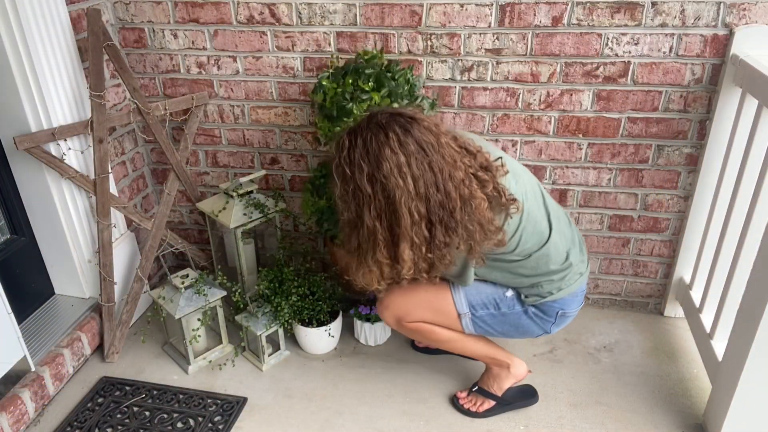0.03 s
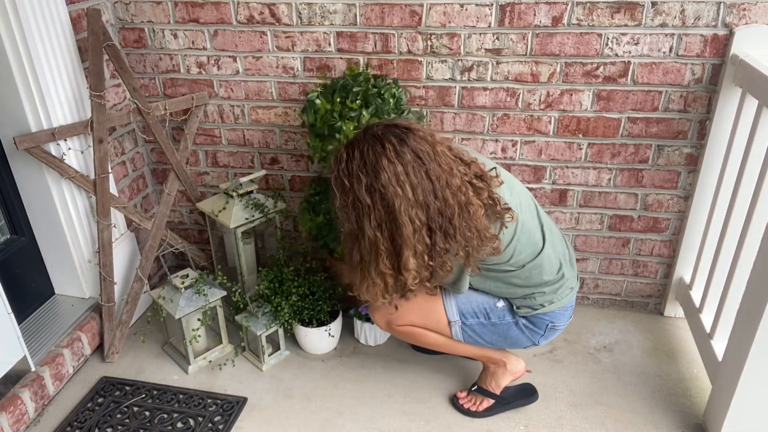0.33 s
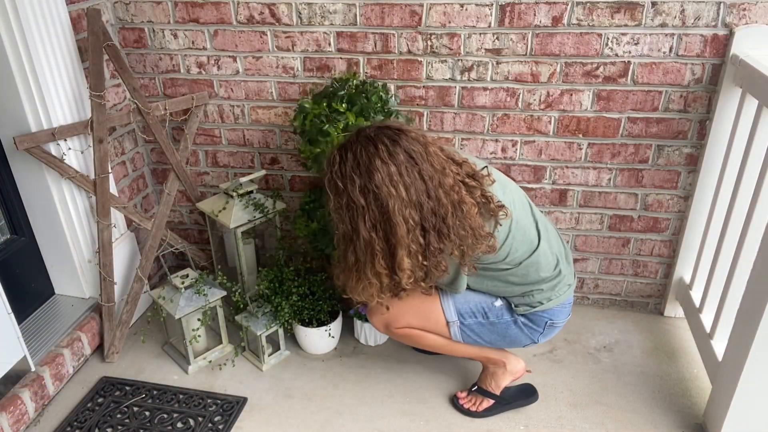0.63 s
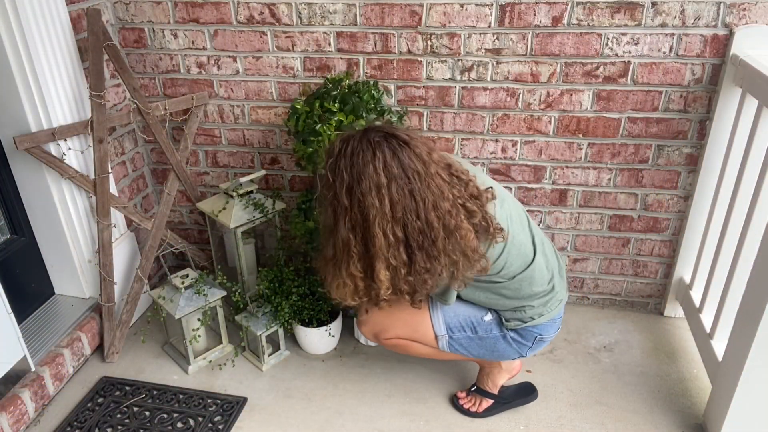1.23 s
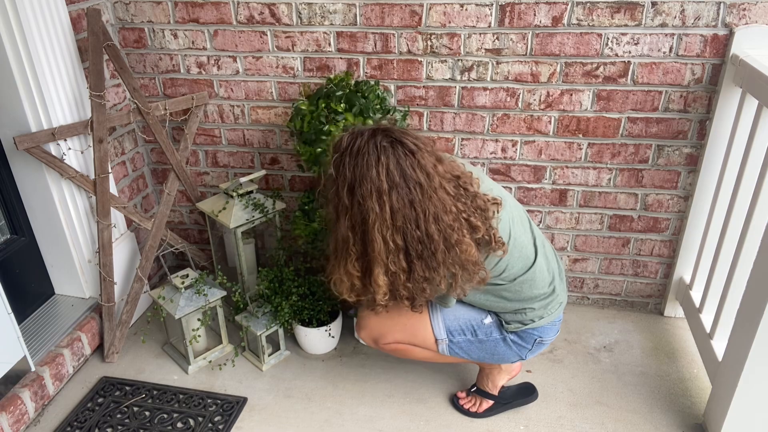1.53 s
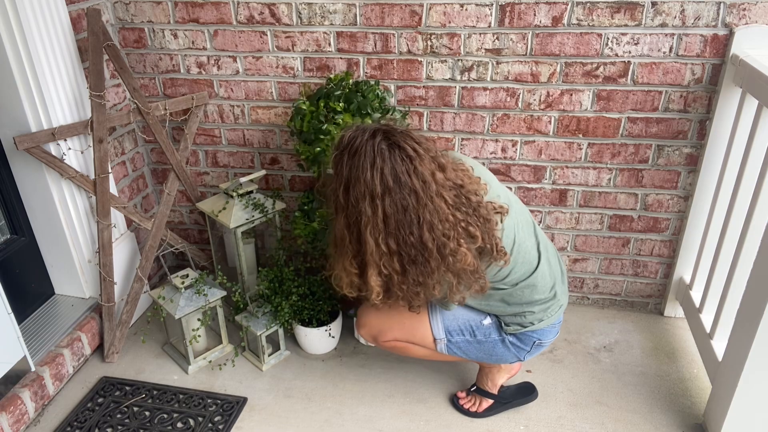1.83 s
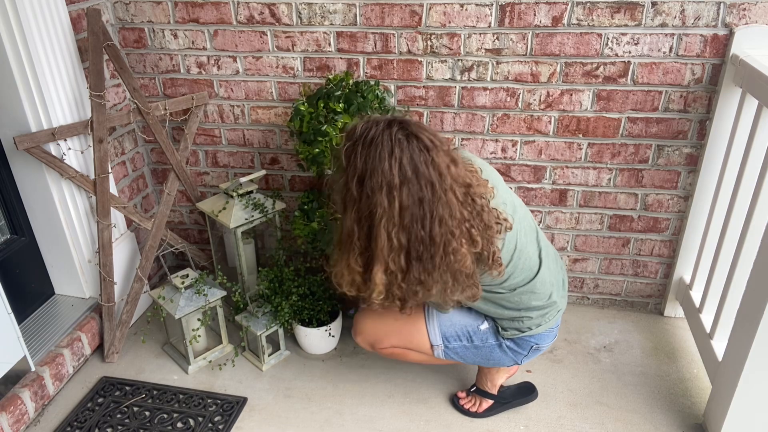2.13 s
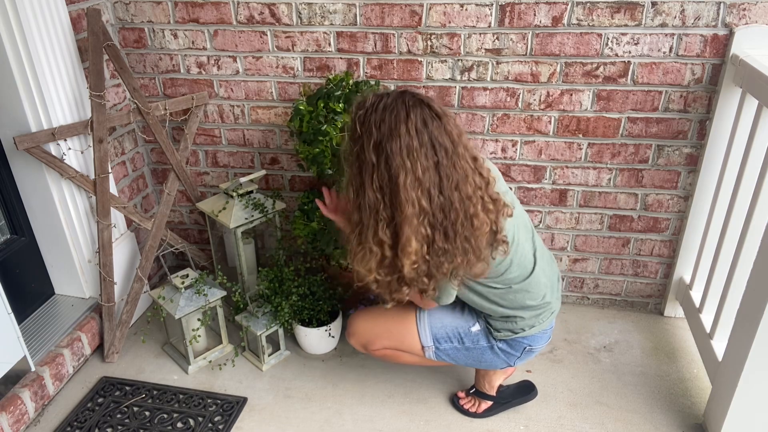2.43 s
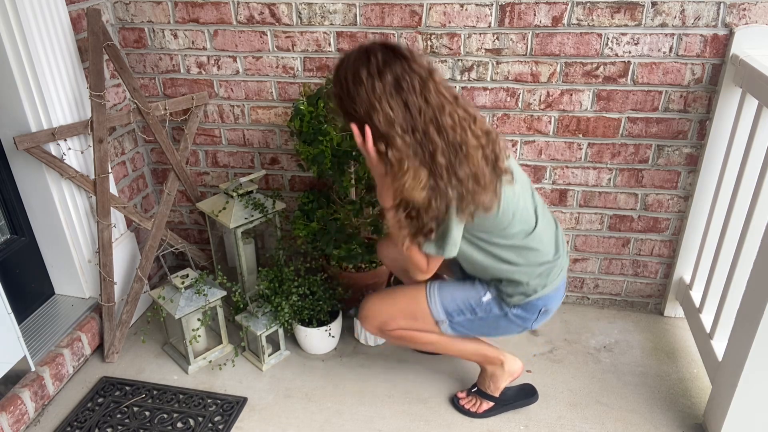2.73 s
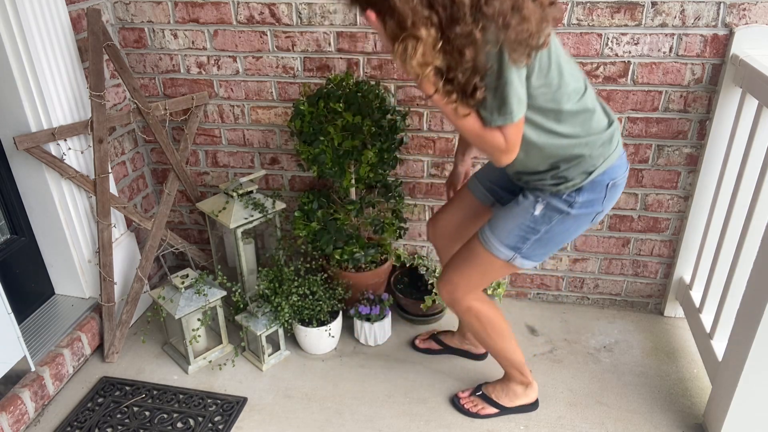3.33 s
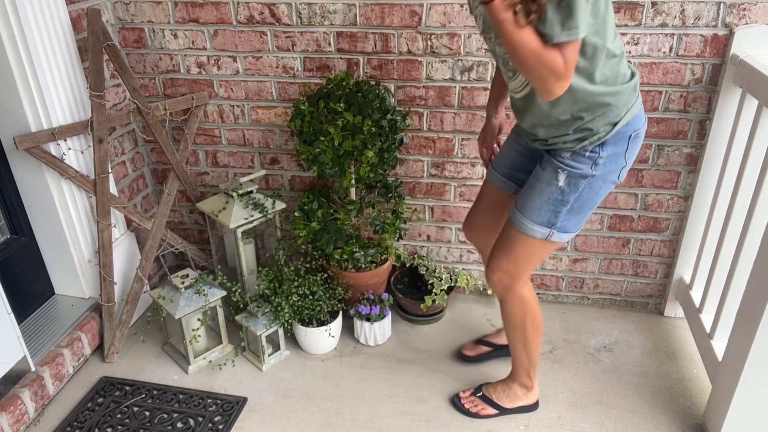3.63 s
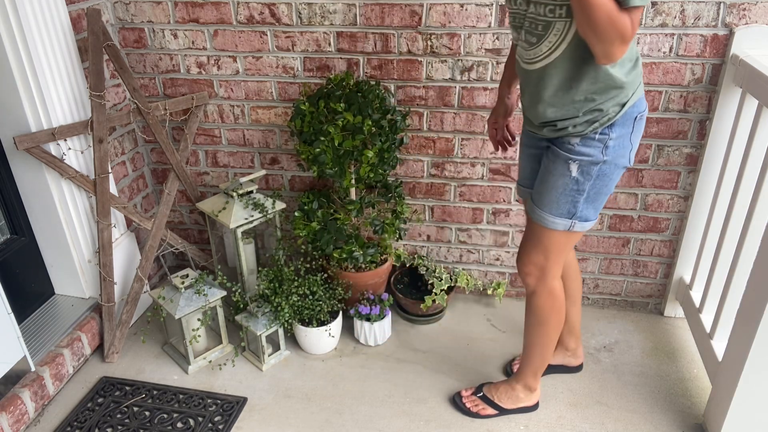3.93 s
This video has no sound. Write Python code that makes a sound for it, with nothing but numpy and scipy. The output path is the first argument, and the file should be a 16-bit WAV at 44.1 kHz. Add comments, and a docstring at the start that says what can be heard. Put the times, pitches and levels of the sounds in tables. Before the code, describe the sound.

Close by on a porch, a plant pot is nudged across concrete in short scrapes, set down with a knock and slid again. Faint bird chirps and rustling leaves follow over a low hum, ending with one sandal slap.

```python
"""On a concrete porch, a plant pot is nudged along in short gritty scuffs, set down with a knock and a
clink against its neighbour, then dragged once more. Grit crushed under its foot makes the pot ring.
Leaves rustle, and a sandal squeaks and slaps as the gardener steps back. Small birds whistle over a
low outdoor hum. The brick wall and the floor add a short, bright echo."""
import sys
import numpy as np
from scipy import signal
from scipy.fft import rfft, irfft
from scipy.io import wavfile
from scipy.ndimage import uniform_filter1d

SR = 44100
rng = np.random.default_rng(int(sys.argv[2]) if len(sys.argv) > 2 else 0)


def inscribe(sig):
    """Save sig as 16-bit PCM at rate SR to the path in sys.argv[1].

    A 1-D sig is mono; a 2-D sig holds one channel per row.
    Samples are clipped to [-1, 1] before scaling.
    """
    pcm = np.round(np.clip(np.atleast_2d(sig).T, -1, 1) * 32767)
    wavfile.write(sys.argv[1], SR, pcm.astype(np.int16))


N = 176400
T = np.arange(N) / SR
LEFT_RIGHT = np.array([[1], [-1]])  # plus for the left ear, minus for the right

# The tones the pot rings with. Each row: pitch in Hz, relative level in dB, seconds to fade by 60 dB.
POT_TONES = [(1089, -2, 0.23), (1126, -7.5, 0.14), (1183, -0.5, 0.069), (1260, 3, 0.19), (1437, -0.5, 0.16),
             (1855, 4.5, 0.085), (1987, 2.5, 0.12), (2170, 2, 0.13), (2250, 5.5, 0.21), (3062, -3, 0.28),
             (3484, -3, 0.25), (3960, 2.5, 0.12), (4900, 9.5, 0.037), (6061, -13, 0.16),
             (7470, 17.5, 0.043), (12100, 5, 0.12)]


def undb(db):
    """Turn decibels into a number to multiply by."""
    return 10 ** (np.asarray(db) / 20)


def unit(x):
    """Scale a signal to an average power of 1."""
    return x / np.sqrt(np.mean(x ** 2))


def curve(rows):
    """A strength that moves over time through (seconds, dB) points."""
    return undb(np.interp(T, *np.array(rows).T))


def response(points, size):
    """The strength of each frequency, on a line through (Hz, dB) points."""
    hz, db = np.array(points).T
    log_hz = np.log(np.fft.rfftfreq(size, 1 / SR) + 1e-3)
    return undb(np.interp(log_hz, np.log(hz), db))


def colour(x, points):
    """Shape a sound's bass and treble. Each row of a colour table: frequency in Hz, relative dB."""
    cepstrum = irfft(np.log(unit(response(points, N))))
    # Fold the filter so that nothing sounds before its cause.
    cepstrum[1:N // 2] *= 2
    cepstrum[N // 2 + 1:] = 0
    impulse = irfft(np.exp(rfft(cepstrum)))[:N // 20]
    return signal.fftconvolve(x, impulse)[:N]


def walk(per_s):
    """A smooth random wander, about 1 in size."""
    span = max(int(SR / per_s), 2)
    steps = rng.standard_normal(N)[np.arange(N) // span]
    return unit(uniform_filter1d(uniform_filter1d(steps, span), span))


def grit(per_s, scatter_db):
    """Tiny impacts of unequal size at random moments."""
    size = undb(scatter_db * np.minimum(rng.exponential(size=N), 3))
    strikes = rng.random(N) < per_s / SR
    return unit(strikes * size * rng.choice([-1, 1], N))


def burst(start, attack, hold, release):
    """A straight rise that dies away once the hold is over; all times in seconds."""
    return np.clip((T - start) / attack, 0, 1) * np.exp(-np.maximum(T - start - hold, 0) / release)


def swell(start, length):
    """A smooth rise and fall."""
    return np.sin(np.pi * np.clip((T - start) / length, 0, 1))


def fade(t, seconds):
    """A fall of 60 dB in the given time."""
    return np.exp(-np.log(1000) * t / seconds)


def tap(start):
    """One clean, hard contact."""
    return 1. * (np.arange(N) == int(start * SR))


def blows(rows, crunch_s):
    """Each (seconds, dB) blow crushes grit for a few milliseconds."""
    force = sum(undb(db) * burst(start, 0.000088, 0, crunch_s) for start, db in rows)
    return force * rng.choice([-1, 1], N)


def ring(x, tones):
    """A struck object rings with fading tones, each a little out of step between the ears."""
    t = T[:N // 8]
    body = 0
    for hz, db, fade_s in tones:
        phase = rng.uniform(0, 2 * np.pi) + 0.48 * rng.choice([-1, 1]) * LEFT_RIGHT
        body = body + undb(db) * fade(t, fade_s) * np.sin(2 * np.pi * hz * t + phase)
    return signal.fftconvolve(x[None], body / np.linalg.norm(body[0]), axes=1)[:, :N]


def porch(x, echo_db):
    """The sound itself, quick echoes off wall and floor, and a weaker, duller tail for each ear."""
    dull_above_hz, build_up_s = 5470, 0.0026
    t = T[:N // 8]
    early, late = rng.standard_normal((2, 2, len(t)))
    smoothing = np.exp(-2 * np.pi * dull_above_hz / SR)
    late = undb(-7) * signal.lfilter([1 - smoothing], [1, -smoothing], late)
    walls = early * fade(t, seconds=0.08) + late * fade(t, seconds=0.26)
    walls *= np.minimum(t / build_up_s, 1)
    walls /= np.linalg.norm(walls, axis=1, keepdims=True)
    echoes = signal.fftconvolve(x[None], walls, axes=1)[:, :N]
    return (x + undb(echo_db) * echoes) / np.hypot(1, undb(echo_db))


def yard(x):
    """Trees and houses scatter a sound into a long blur."""
    t = T[:N // 6]
    echoes = rng.standard_normal((2, len(t))) * fade(t, seconds=0.99)
    return signal.fftconvolve(x[None], echoes / np.linalg.norm(echoes[0]), axes=1)[:, :N]


def outdoors():
    """The neighbourhood rumbles and a distant machine hums, wavering slightly."""
    # The outdoor air. Each row: frequency in Hz, relative level in dB.
    air_colour = [(20, -29), (32, -4.5), (48, -1.5), (72, -1), (105, 1.5), (140, -4.5), (250, -10),
                  (500, -17.5), (1000, -22.5), (1800, -31.5), (3500, -36), (6000, -56.5), (11000, -57),
                  (15500, -77)]
    # The machine's tones. Each row: pitch in Hz, level in dB midway between the ears.
    hum_tones = [(55.2, -50.5), (93.8, -61), (107, -58), (163, -64.5), (186, -68.5), (281, -69.5)]
    air = np.array([unit(irfft(rfft(rng.standard_normal(N)) * response(air_colour, N))) for _ in range(2)])
    middle, side = undb(-53.5) * air * undb(.5 * walk(5.38))
    hum = 0
    for hz, db in hum_tones:
        strength = np.sqrt(2) * undb(db + walk(8.8))
        hum = hum + strength * np.sin(2 * np.pi * hz * (T + 0.00059 * walk(5)))
    return middle + side * LEFT_RIGHT + hum * undb(1.24 * LEFT_RIGHT)


def whistle(hz, gain, rasp):
    """A bird's almost pure voice, with a quick waver in pitch."""
    pitch = hz * (1 + rasp * walk(2500))
    return np.sqrt(2) * gain * np.sin(2 * np.pi * np.cumsum(pitch) / SR)


def birdsong():
    """A small bird repeats one note that sweeps up and then falls."""
    # The notes. Each row: start in seconds, level in dB.
    notes = [(.003, -67.5), (.125, -65.5), (0.251, -67), (0.367, -69.5), (0.487, -67), (.99, -80),
             (1.104, -66), (1.219, -65.5), (1.594, -66)]
    # One note's shape. Each row: seconds from its start, pitch in Hz, added level in dB.
    note_shape = [(0, 4400, -5), (.012, 4850, -3), (.023, 5300, 4.5), (.034, 5800, -1.5), (0.037, 6800, -3),
                  (.048, 6270, 1), (.062, 5480, -2), (.075, 5130, -11)]
    times, hz, db = np.array(note_shape).T
    song = 0
    for start, level in notes:
        sounding = (T > start) * (T < start + times[-1])
        gain = undb(level + np.interp(T - start, times, db)) * sounding
        song = song + whistle(np.interp(T - start, times, hz), gain, rasp=0.0175)
    return porch(song, echo_db=3.5)


def chirps():
    """Other birds give short, raspy, mostly falling calls, the far ones blurred by the yard."""
    # Each row: start and length in seconds, first and last pitch in Hz, level in dB,
    # rasp as a share of the pitch, share of the power that the yard scatters.
    calls = [(1.94, 0.04, 4120, 3250, -59.5, 0.074, 0.7), (1.981, 0.026, 4330, 4800, -67, .06, 0.4),
             (2.047, 0.05, 3984, 3310, -61, .07, 0.26), (2.085, 0.26, 3500, 3550, -69.5, 0.17, 0.9),
             (2.46, 0.077, 4950, 4510, -62.5, 0.13, 0.08), (2.503, 0.0396, 3360, 2980, -53, 0.067, 0.01),
             (2.524, 0.041, 2920, 2680, -56, 0.09, 0.06), (3.273, 0.056, 2033, 1770, -67, 0.021, 0.3)]
    near = far = 0
    for start, length, first, last, db, rasp, scattered in calls:
        pitch = np.interp(T, [start, start + length], [first, last])
        call = whistle(pitch, undb(db) * swell(start, length), rasp)
        near = near + np.sqrt(1 - scattered) * call
        far = far + np.sqrt(scattered) * call
    return porch(near, echo_db=4.5) + yard(far)


def leaves():
    """Leaves and clothes crackle finely, and foliage swishes as the gardener rises."""
    # The rustle. Each row: time in seconds, level in dB.
    rustle = [(0, -66.5), (.19, -62), (.4, -58), (.55, -64.5), (.85, -75), (1.15, -59), (1.23, -85),
              (1.6, -71), (1.7, -69), (2.2, -68.5), (2.38, -64.5), (2.5, -80), (2.8, -75.5), (2.92, -67.5),
              (3.03, -62), (3.13, -74), (3.37, -80.5), (3.44, -67.5), (3.52, -69.5), (3.62, -74.5),
              (4, -100)]
    # Each row: start and length in seconds, level in dB.
    swishes = [(2.814, 0.27, -65)]
    # The crackle and the brighter swish. Each row: frequency in Hz, relative level in dB.
    crackle_colour = [(400, 8.5), (1500, -2.5), (4000, -1.5), (7000, -0.5), (12000, -5), (15500, -3.5)]
    swish_colour = [(2000, -22), (5000, -15), (8000, 3), (12000, 0), (15500, -10)]
    crackle = colour(curve(rustle) * grit(per_s=2500, scatter_db=3.5), crackle_colour)
    brush = sum(undb(db) * swell(start, length) for start, length, db in swishes)
    swish = colour(brush * grit(per_s=6700, scatter_db=5), swish_colour)
    return porch(crackle + swish, echo_db=-3.0)


def squeak():
    """The rubber sole twists on the concrete: a short, rough tone and its octave."""
    # Each row: start and length in seconds, pitch in Hz, level in dB.
    twists = [(3.506, 0.012, 1955, -55.5)]
    rubber = 0
    for start, length, hz, db in twists:
        phase = 2 * np.pi * np.cumsum(hz * (1 + 0.0232 * walk(1200))) / SR
        tone = np.sin(phase) + undb(-4) * np.sin(2 * phase)
        rubber = rubber + undb(db) * swell(start, length) * tone
    return porch(rubber, echo_db=4.0)


def sandal():
    """A foot lands softly, then the sole gives a brief, bright smack."""
    # The footfall and the slap. Each row: start in seconds, level in dB.
    steps = [(3.798, -55)]
    slaps = [(3.836, -35)]
    # Their colours. Each row: frequency in Hz, relative level in dB.
    step_colour = [(120, -29), (330, 1.5), (700, -1), (1500, -9.5), (3000, -14), (8000, -30)]
    slap_colour = [(150, -7), (600, -24), (1800, -0.5), (4500, -4), (8000, -0.5), (11500, 6), (15500, 3)]
    tread = sum(undb(db) * burst(start, 0.0036, hold=0.0043, release=0.05) for start, db in steps)
    smack = sum(undb(db) * burst(start, 0.0044, hold=0.0068, release=0.011) for start, db in slaps)
    sole = grit(per_s=7400, scatter_db=3.0)
    return porch(colour(tread * sole, step_colour) + colour(smack * sole, slap_colour), echo_db=4.0)


def ticks():
    """Bits of grit and twigs give small, sharp ticks."""
    # Each row: start in seconds, relative level in dB.
    snaps = [(.178, -48.5), (.197, -46.5), (.9176, -41.5), (1.061, -52), (1.289, -48.5), (1.337, -40),
             (1.352, -35), (1.408, -44), (2.377, -45.5), (2.388, -53.5), (3.513, -54)]
    # Each row: frequency in Hz, relative level in dB.
    tick_colour = [(300, 2), (1000, -33), (2000, 5.5), (6000, 7.5), (10000, -3), (15500, 5)]
    crunch = colour(blows(snaps, crunch_s=0.0019), tick_colour)
    return porch(undb(4.5) * crunch, echo_db=9.5)


def clink():
    """The pot lightly touches its neighbour, which rings."""
    # Each row: time in seconds, strength of the touch in dB.
    touches = [(1.0615, -17)]
    # The other pot's tones. Each row: pitch in Hz, relative level in dB, seconds to fade by 60 dB.
    neighbour_tones = [(1180, -2, .15), (1470, -9, .07), (2150, -7, .11), (2185, -14, .16), (2525, -2, .11),
                       (2923, -12, .13), (3391, -2, .09), (3440, -5, .07), (5600, -3, .045),
                       (7130, 1, .045)]
    return ring(sum(undb(db) * tap(start) for start, db in touches), neighbour_tones)


def scuffs():
    """The pot's foot catches and slips: grit rings the pot, its body judders and fine sand hisses."""
    # Each row: start, hold and release in seconds, then the levels of grit, judder and hiss in dB.
    nudges = [(0.61, 0.027, 0.0054, -47, -81, -44), (0.6232, 0.012, 0.014, -43, -43, -41.5),
              (0.642, 0.013, 0.069, -40, -47.5, -74), (0.7247, 0.0075, 0.03, -43, -80, -35),
              (0.781, 0.016, 0.02, -45.5, -57, -34.5), (0.838, 0.0087, 0.022, -68, -61.5, -48),
              (0.87, 0.026, 0.0052, -75.5, -70, -51)]
    # The three colours. Each row: frequency in Hz, relative level in dB.
    scrape_colour = [(200, -5.5), (700, -5), (950, 2), (1170, 13.5), (1650, -3.5), (2050, 4), (4800, -5),
                     (7500, -4.5), (10000, -8), (15500, -18)]
    judder_colour = [(100, -33), (170, -9.5), (258, 10), (340, 0), (500, 1.5), (775, 0), (1200, -10),
                     (2000, -53)]
    hiss_colour = [(1000, -5), (3000, -2.5), (4800, 6.5), (6000, 4), (7500, 3.5), (10000, 4), (12000, -5),
                   (15500, 7)]
    slip, push, sand = sum(undb(levels)[:, None] * burst(start, 0.004, hold, release)
                           for start, hold, release, *levels in nudges)
    grains = slip * grit(per_s=3400, scatter_db=4.0)
    judder = colour(push * grit(per_s=1200, scatter_db=1.5), judder_colour)
    hiss = colour(sand * grit(per_s=8400, scatter_db=3.5), hiss_colour)
    scrape = colour(grains, scrape_colour)
    return porch(scrape + judder + hiss, echo_db=-7.5) + undb(-14) * ring(grains, POT_TONES)


def drag():
    """In a longer slide the pot's foot sticks and slips unevenly over the grit, and its rim sings."""
    # How hard the foot presses. Each row: time in seconds, level in dB.
    pressure = [(1.33, -105), (1.338, -56), (1.349, -51), (1.354, -40.5), (1.38, -37.5), (1.393, -43),
                (1.406, -33.5), (1.445, -33), (1.488, -34.5), (1.525, -39), (1.56, -52.5), (1.59, -95)]
    # Each row: frequency in Hz, relative level in dB.
    scrape_colour = [(200, -44), (380, -19.5), (470, -5), (570, -2), (720, -13.5), (1000, -3.5), (1300, -2),
                     (1600, -8.5), (2200, -0.5), (6000, -2.5), (9000, -4), (12000, -4.5), (15500, -15.5)]
    # Each row: pitch in Hz, relative level in dB, seconds to fade by 60 dB.
    rim_tones = [(5500, 7, .06), (5990, 5, 0.064), (5940, -10.5, 0.0345), (7060, -22, 0.048)]
    slips_per_s, unevenness, slip_depth = 125, 0.2874, 0.38
    cycles = np.cumsum(slips_per_s * (1 + unevenness * walk(150))) / SR
    grip = unit(1 + slip_depth * np.cos(2 * np.pi * cycles))
    fine = grit(per_s=8300, scatter_db=0.5)
    coarse = undb(-9) * grit(per_s=260, scatter_db=-1.5)
    grains = curve(pressure) * grip * unit(fine + coarse)
    scrape = porch(colour(grains, scrape_colour), echo_db=-4.5)
    return scrape + undb(-11) * ring(grains, POT_TONES) + undb(-13.5) * ring(grains, rim_tones)


def knocks():
    """The pot catches and drops onto its foot; each contact crunches and favours some of its tones."""
    # Each row: start in seconds, relative crunch and ring levels in dB, favoured pitch in Hz.
    contacts = [(0.6243, -37, -17.5, 1190), (0.628, -44, -17, 5000), (0.654, -57, -24, 1200),
                (.729, -30.5, -8, 5020), (0.7914, -32.5, -16.5, 2400), (0.844, -43, -35, 1310),
                (0.8724, -48, -32, 4230), (0.9587, -25, -10, 1920), (1.354, -63, -26, 5000),
                (1.379, -56, -26, 3020)]
    # Each row: frequency in Hz, relative level in dB.
    crunch_colour = [(200, -18), (500, -7), (900, -19), (1150, -4), (2100, 0), (3500, -2), (5300, -2),
                     (8000, -7), (12000, -15.5), (15500, -13)]
    reach_octaves = 0.82  # tones further than this from the favoured pitch ring weakly
    crunch = blows([row[:2] for row in contacts], crunch_s=0.0038)
    pot = porch(undb(2.0) * colour(crunch, crunch_colour), echo_db=3.0)
    hz, db, fade_s = np.array(POT_TONES).T
    for start, _, ring_db, favoured_hz in contacts:
        loss_db = 10 * np.log10(1 + (np.log2(hz / favoured_hz) / reach_octaves) ** 4)
        pot = pot + undb(ring_db) * ring(tap(start), zip(hz, db - loss_db, fade_s))
    return pot


def scene():
    """The pot, the gardener and the garden, heard together."""
    pot = scuffs() + drag() + knocks()
    return pot + ticks() + clink() + sandal() + squeak() + leaves() + birdsong() + chirps() + outdoors()


def record(dry):
    """Two microphones narrow or widen each band, put the treble out of step and cut the very top."""
    # Stereo width. Each row: frequency in Hz, gain in dB of what differs between left and right.
    width = [(30, 9), (120, -6.5), (300, -3.5), (600, 3.5), (1200, 3), (2500, 1.5), (6500, 3.5), (8000, 4),
             (9000, -17.5), (10500, 1.5), (12000, -31), (13400, -4), (14500, -28)]
    # Each row: frequency in Hz, how far the left wave runs ahead of the right in radians.
    left_lead = [(20, 0), (5800, 0), (7000, -1.2), (8000, -2.1), (8500, -3.1), (9700, -3.2), (10500, -4.3),
                 (11400, -6.2), (12600, -6.3), (13500, -7.8), (14000, -9.4), (16000, -9.4)]
    top_hz = 15800
    left, right = rfft(dry, 2 * N)
    pair = (left + right) / 2 + LEFT_RIGHT * response(width, 2 * N) * (left - right) / 2
    lead = np.interp(np.fft.rfftfreq(2 * N, 1 / SR), *np.array(left_lead).T)
    heard = irfft(pair * np.exp(1j * LEFT_RIGHT * lead / 2))[:, :N]
    return signal.sosfilt(signal.ellip(10, .2, 80, top_hz, fs=SR, output="sos"), heard)


dry = scene()
out = record(dry)
inscribe(out)
```